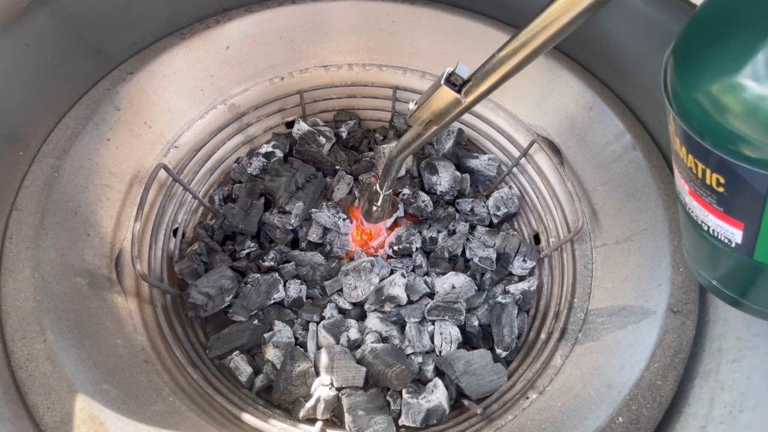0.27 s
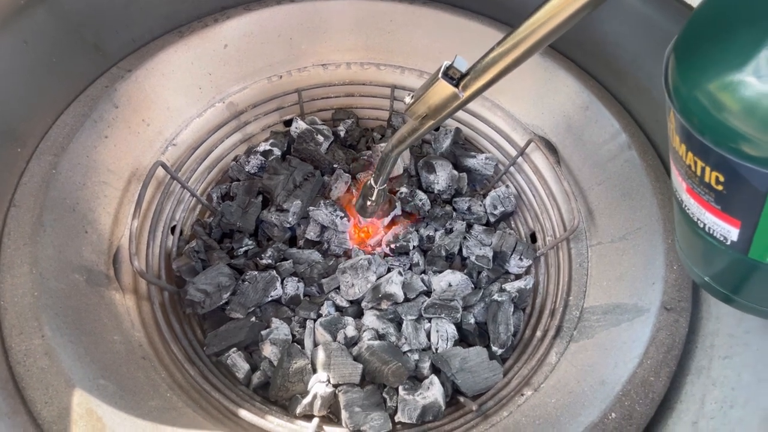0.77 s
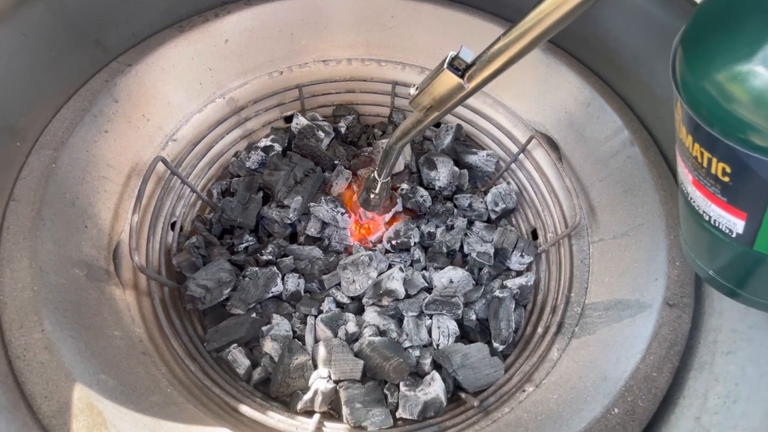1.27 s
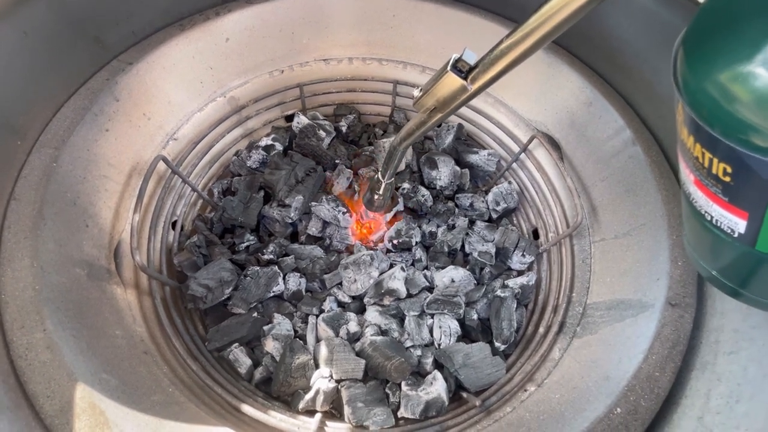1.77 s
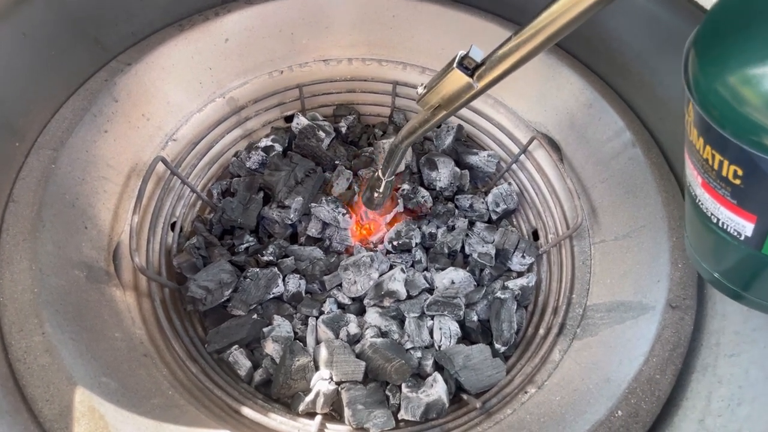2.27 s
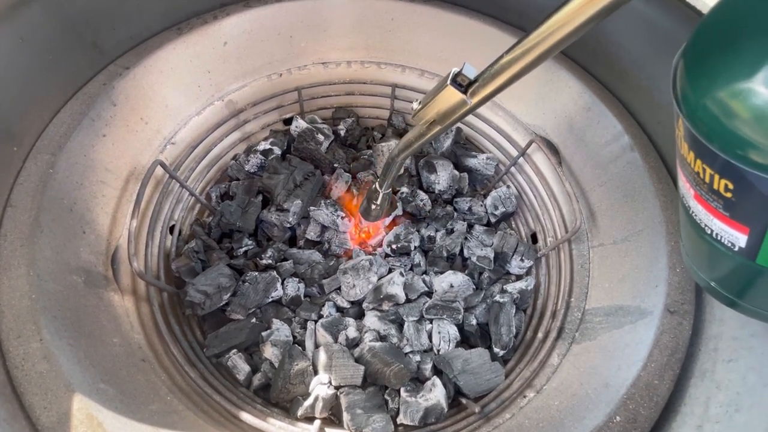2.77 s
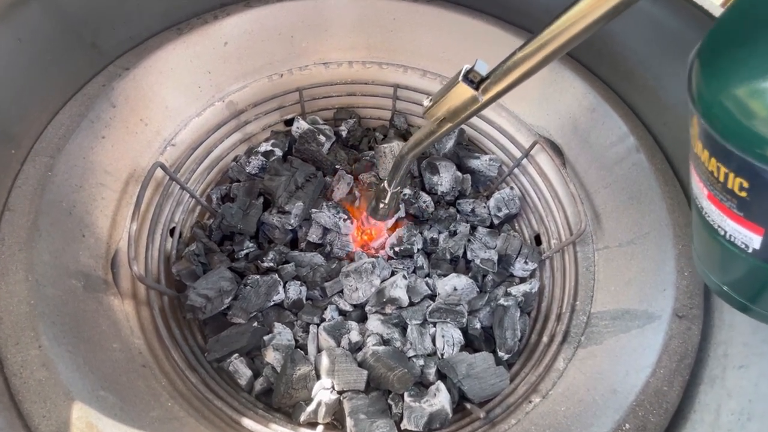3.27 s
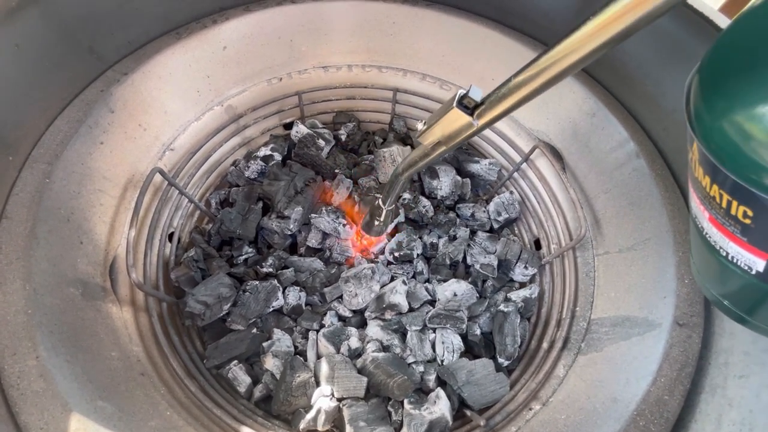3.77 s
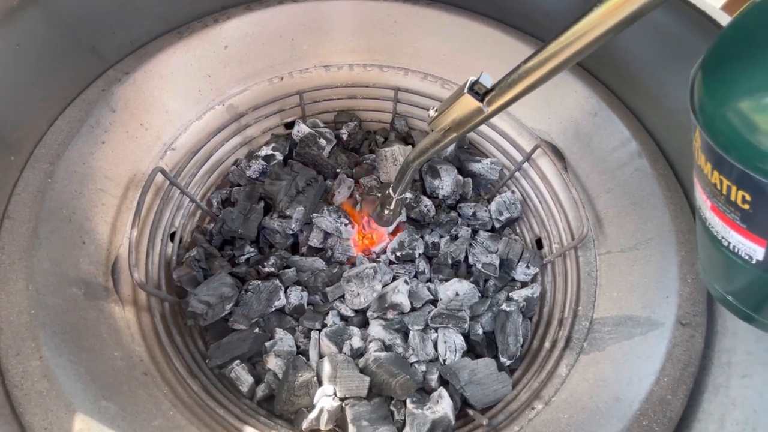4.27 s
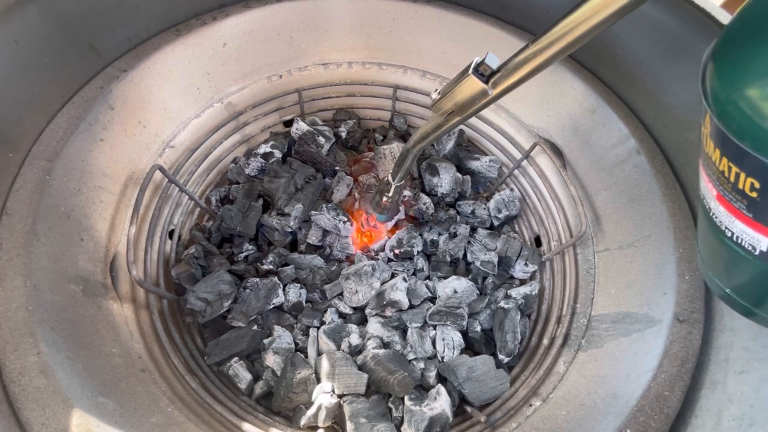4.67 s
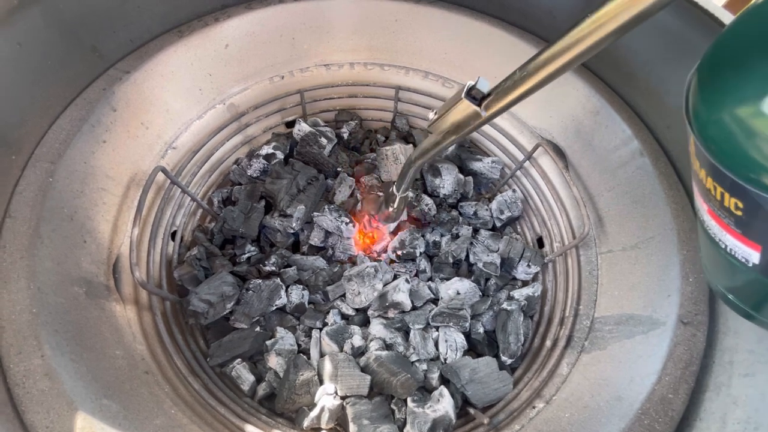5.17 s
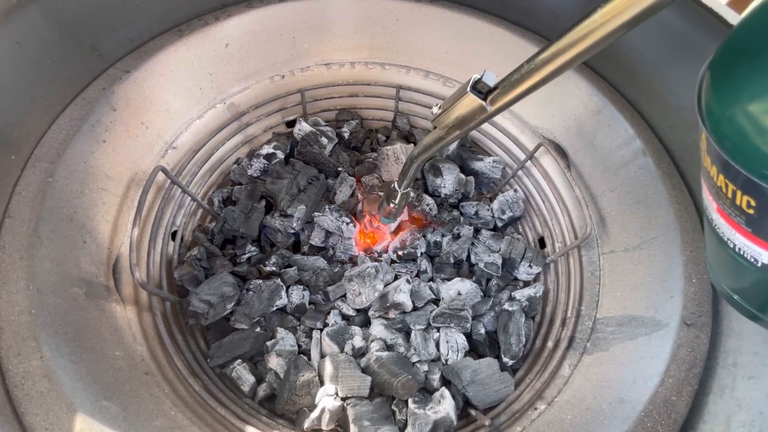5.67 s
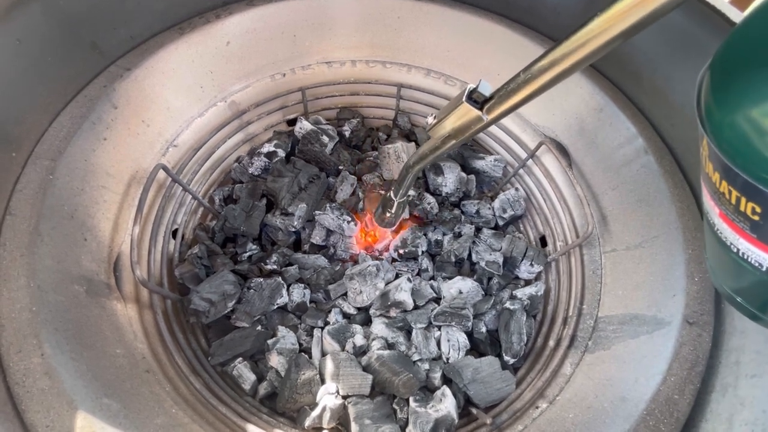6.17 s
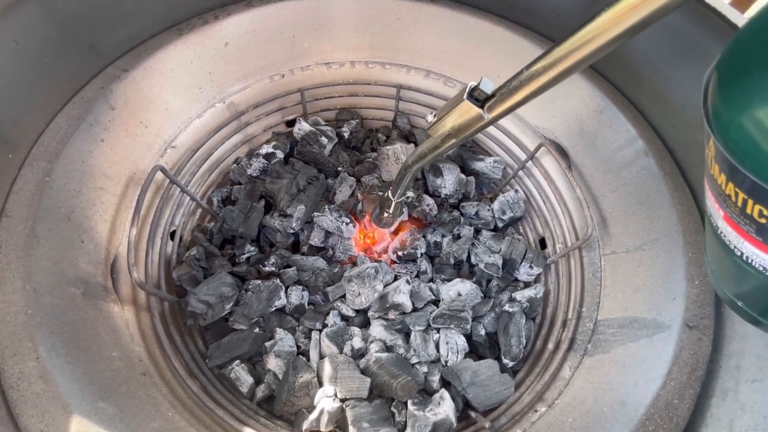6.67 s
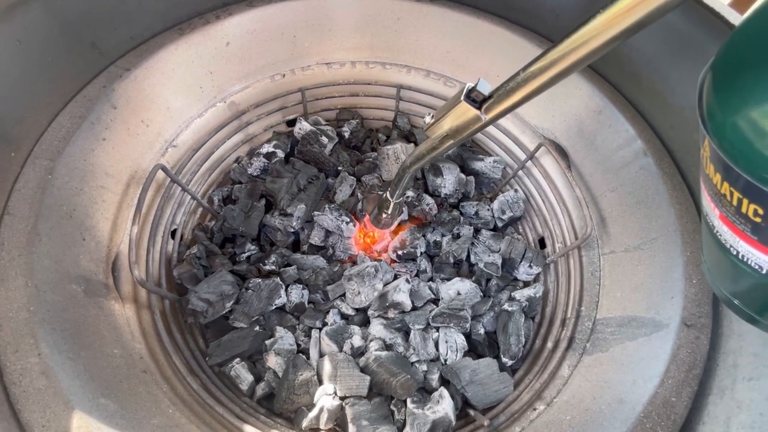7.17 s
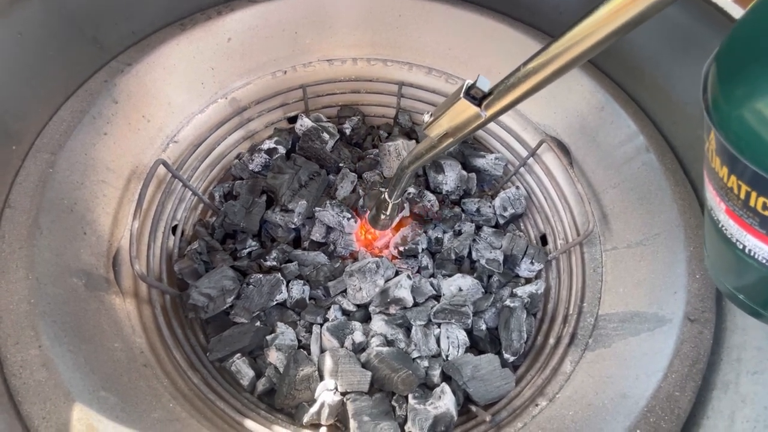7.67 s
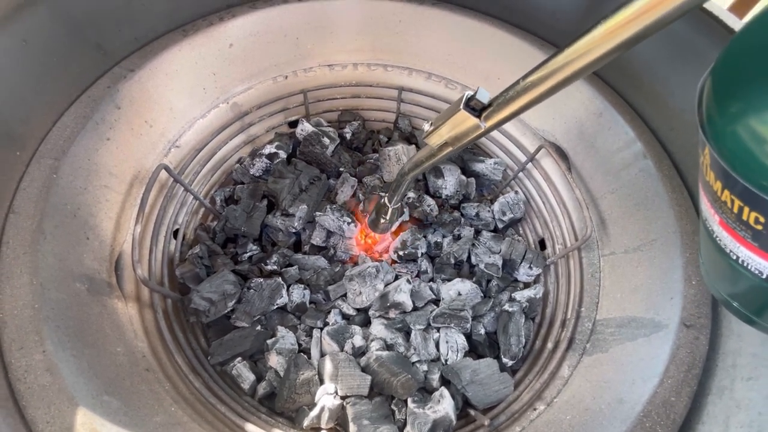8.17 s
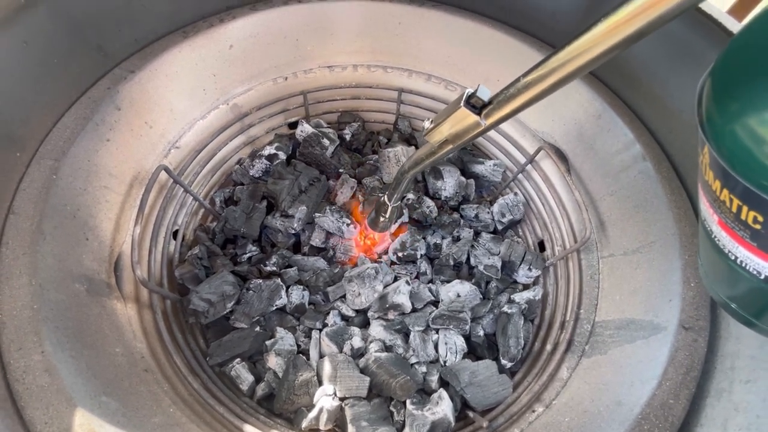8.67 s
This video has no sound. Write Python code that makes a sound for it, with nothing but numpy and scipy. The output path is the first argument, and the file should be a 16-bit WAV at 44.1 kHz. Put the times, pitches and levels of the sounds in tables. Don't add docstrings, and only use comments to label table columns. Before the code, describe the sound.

A gas torch hisses steadily and strongly onto charcoal, with a low fluttering flame roar growing beneath it and outdoor wind buffeting the microphone.

```python
import sys
import numpy as np
from scipy import signal
from scipy.fft import rfft, irfft
from scipy.io import wavfile
from scipy.ndimage import uniform_filter1d

SR = 44100
rng = np.random.default_rng(int(sys.argv[2]) if len(sys.argv) > 2 else 0)


def voltage_ratio(decibels):
    exponent = np.asarray(decibels, float) / 20
    return 10 ** exponent


def waveform_to_disk(signal):
    frames = np.transpose(np.atleast_2d(signal))
    scaled = np.clip(frames, -1, 1) * 32767
    samples = np.round(scaled).astype(np.int16)
    wavfile.write(sys.argv[1], SR, samples)


N = 393813

# (time [s], level [dB])
WIND_SWELL = [(0, -60), (.6, -66), (1.1, -62), (1.42, -47), (1.56, -50), (1.65, -61), (2.05, -62),
              (2.3, -61), (3., -48), (3.6, -42), (4.05, -43), (4.25, -30), (4.6, -30), (5.25, -34.5),
              (5.5, -42), (7.2, -41), (7.7, -40.5), (8.93, -38.5)]
# (time [s], change [dB], length [s])
GUSTS = [(.808, 9, .12), (1.896, 5, .1), (2.165, 23, 0.12), (3.143, 11, 0.083), (3.557, 5, .08),
         (3.8, 5, .12), (3.981, -12, .05), (4.7, -9, 0.087), (4.9, 3, .1), (5.19, 0, .06), (7.144, 3, .08),
         (7.39, -12, .05), (7.45, 5, .1), (7.663, -11, .05), (7.992, 2, 0.083)]
# (frequency [Hz], level [dB])
GUST_COLOUR = [(15, -20), (30, -14), (50, -3), (80, -0.5), (110, 1), (200, -10), (300, -20)]
# (time [s], level [dB], length [s], left minus right [dB])
PUFFS = [(0.162, -40, 0.075, -9), (0.336, -36, 0.11, -12), (0.672, -42, 0.25, -5), (1.196, -39, 0.12, -3),
         (1.447, -34, 0.24, -10), (1.61, -35, .06, -2), (1.748, -50, 0.055, -6), (1.907, -36, 0.28, -3),
         (2.147, -33.5, 0.1, -9), (2.336, -37, 0.11, -5), (3.113, -37, 0.11, -6), (3.882, -34, 0.15, -6),
         (4.52, -37.5, 0.097, -19), (4.95, -39, 0.23, -4), (5.3, -40, 0.14, 0)]
# (frequency [Hz], level [dB])
PUFF_COLOUR = [(60, -36), (110, 4.5), (170, 3.5), (280, -1.5), (450, -6.5), (650, -20), (1000, -45)]
# (time [s], change [dB], length [s])
BASS_DIPS = [
    (.395, -10, .13),
    (.925, -6, 0.094),
    (2.04, -5, 0.14),
    (2.39, -11, 0.057),
]

# (time [s], level [dB])
ROAR_SWELL = [(0, -36.5), (.3, -38.5), (.55, -36), (1., -33.5), (1.3, -26.5), (1.5, -27), (1.58, -34),
              (1.95, -39.5), (2.05, -41), (2.2, -32), (2.42, -35), (2.46, -24.5), (3.6, -25), (5.2, -25.5),
              (5.8, -22), (7.1, -21.5), (7.9, -24.5), (8.93, -23.5)]
# (time [s], change [dB])
FLARES = [(0.066, 12), (.619, 8), (1.327, 1), (1.412, 0), (1.791, 3), (2.135, 13.5), (2.534, 4), (2.70, 4),
          (2.824, -3.5), (2.86, 2), (3.652, -4), (3.801, 9), (4.205, 5.5), (4.689, 7), (4.789, 7),
          (4.939, 3.5), (5.188, -4), (5.565, 3), (5.632, -13), (6.061, 4), (6.14, -9), (6.685, 4),
          (6.755, -15), (6.929, 5.5), (6.975, -11), (7.917, -14), (8.002, 3), (8.436, 8), (8.53, 6.5),
          (8.66, -1)]
# (frequency [Hz], level [dB per Hz])
BOWL_LOW = [(24, -57), (40, -38), (97, -11), (134, -2), (150, 3.5), (170, -2.5), (259, -21), (265, -36),
            (340, -61), (580, -120)]
# (frequency [Hz], level [dB per Hz])
BOWL_HIGH = [(150, 3.5), (260, -14), (289, 4.5), (312, 3.5), (331, 1.5), (366, -8.5), (421, -12.5),
             (480, -75), (620, -75), (1060, -120)]

# (time [s], level [dB])
JET_SWELL = [(0, -33.5), (.4, -33), (1., -32), (1.55, -32.5), (2.4, -31.5), (2.75, -32), (3.3, -31),
             (4.2, -31.5), (4.65, -30), (4.95, -34), (5.3, -30), (5.9, -31.5), (6.25, -33), (6.8, -29.5),
             (7.45, -28.5), (7.95, -30.5), (8.5, -31.5), (8.93, -29.5)]
# (frequency [Hz], half width [Hz], level [dB], left minus right [dB], extra lead
BURNER_MODES = [(498, 96, -68.5, -1, 2), (629, 65, -70, -17, 0.3), (932, 27, -69.0, -11, -0.3),
                (1023, 40, -57.5, -3.1, -0.17), (1256, 87, -68.5, -3.5, 1.06), (1666.6, 45, -57, -3, -0.37),
                (1790, 330, -69, 0.1, -0.96), (2219, 48, -59, -4, -0.5), (2517, 110, -70.5, -3.5, -1),
                (2860, 95, -70.4, 4, -1.22), (3270, 270, -71, -2.5, -0.94), (3410, 54, -70.5, -6, -0.2),
                (3965, 166, -68.5, -3.5, 0.73), (4656, 100, -65, 0, -1.17), (5090, 140, -69.5, 10, -0.9),
              (5212, 66, -60, 4.5, 0.063), (5773, 162, -61, -3.5, 0.39), (6010, 380, -63, -5, -1.4),
              (6324, 161, -59, -1.5, 0.88), (6820, 110, -63, -1.8, -0.55), (7560, 150, -72, 4, 0.033),
                (8120, 256, -71.7, 3.4, 0.1), (9080, 479, -81.1, 2.8, -1.6),
                 (9770, 390, -76.8, -5.0, 1.0), (10250, 171, -71.7, -5.1, 0.3),
                 (10740, 119, -71.2, -1.4, 0.0), (11320, 184, -68.8, -0.2, -0.1),
                 (11780, 143, -76.8, -0.7, -0.1), (12760, 542, -83.7, -0.9, -2.0),
                 (15420, 252, -79.9, -0.0, -1.5)]
# (frequency [Hz], level [dB], left minus right [dB], left-right likeness [0-1])
SCATTER = [(414, -76, -3.5, 0.52), (790, -73.5, -4.5, 0.22), (1440, -80.5, -2, .05), (1970, -75.5, 4, 0.3),
           (2690, -72.5, -4.5, 0.58), (3250, -74.5, -2, 0.95), (3600, -76.5, 4, 0.23),
           (4120, -76.5, 1, 0.91), (4850, -75.5, 0, .1), (5700, -70, -4.5, 0.056), (7200, -77, 6, .05),
           (8500, -75, 1.5, 0.63), (11000, -84.5, -2, 0.83), (13750, -82, 0, 0.37), (13950, -85, 0, .99),
           (15100, -79.5, 0, 1), (15250, -78, 2, 0.68)]
# (frequency [Hz], phase [rad])
PORT_LEAD = [(400, .5), (1500, 4.), (3200, 9.3), (3550, 9.6), (3900, 11.7), (4150, 12.5), (4400, 14.3),
             (5300, 18.6), (5900, 16.6), (6950, 22.1), (7600, 20.5), (8700, 22.6), (9400, 27.8),
             (10500, 25.3), (12300, 25.1), (13900, 22.)]
# (time [s], change [dB], length [s])
TURNS = [
    (3.5, 2, 0.58),
    (4.4, 1.5, .9),
    (5.7, -1, 0.79),
    (7.3, -1.5, 0.96),
]
# (time [s], change [dB], length [s])
CANCELS = [
    (.28, -4, .35),
    (1.5, -4, 0.58),
    (2.85, -4, .7),
    (4.2, -4, .5),
    (7.4, -4.5, 0.98),
    (8.3, -3, .5),
]

FRAME, HOP = 2048, 512


def evened(x):
    return x / np.sqrt(np.mean(x ** 2) + 1e-20)


def read(points, hz):
    f, *columns = np.transpose(points)
    return [np.interp(np.log(hz + 1), np.log(f + 1), c) for c in columns]


def follow(rows, t):
    s, *columns = np.transpose(rows)
    return [np.interp(t, s, c) for c in columns]


def bumps(rows, s):
    coarse = np.arange(0, N / SR + 1, 1 / 500)
    total_db = sum(db * np.exp(-(2 * (coarse - at) / length) ** 2) for at, db, length in rows)
    return np.interp(s, coarse, total_db)


def wander(t, slow_hz, fast_hz):
    rates = np.geomspace(slow_hz, fast_hz, num=24)
    return evened(sum(np.sin(2 * np.pi * (f * t + rng.random())) / np.sqrt(f) for f in rates))


def band(x, low_hz, high_hz):
    return signal.sosfiltfilt(signal.butter(4, [low_hz, high_hz], "bandpass", fs=SR, output="sos"), x)


def coloured(points, same, lead=0., balance_db=0.):
    hz, same = np.fft.rfftfreq(N, 1 / SR), np.clip(same, 0, 1)
    left, other = rfft(rng.standard_normal((2, N)))
    right = (same * left + np.sqrt(1 - same ** 2) * other) * np.exp(1j * lead)
    pair = np.array([left * voltage_ratio(balance_db / 2), right / voltage_ratio(balance_db / 2)])
    inside = (hz > points[0][0]) & (hz < points[-1][0])
    return evened(irfft(pair * voltage_ratio(read(points, hz)[0]) * inside, N))


def port_pair(shape, same, lead):
    a, b, c, d = np.moveaxis(rng.standard_normal(shape + (4,)), -1, 0)
    same, left = np.clip(same, 0, 1), a + 1j * b
    right = (same * left + np.sqrt(1 - same ** 2) * (c + 1j * d)) * np.exp(1j * lead)
    return np.array([left, right])


def puffs(s, lumps):
    sides = np.array([[.5], [-.5]])
    strength = sum(voltage_ratio(db + pan_db * sides) * np.exp(-(2 * (s - at) / length) ** 2)
                   for at, db, length, pan_db in PUFFS)
    strength = strength * voltage_ratio(bumps(BASS_DIPS, s))
    return band(strength * evened(lumps * coloured(PUFF_COLOUR, 0.035)), 90, 900)


def wind():
    s, sides = np.arange(N) / SR, np.array([[.5], [-.5]])
    throb_db = follow(WIND_SWELL, s)[0] + bumps(GUSTS, s) + 1.8 * bumps(BASS_DIPS, s)
    deep_rise_db = -11 / (1 + np.exp((s - 4.1) / .2))
    deep_db = -11.5 + 0.4 * (throb_db + 37) + deep_rise_db
    lumps = voltage_ratio(0.54 * np.array([wander(s[::64], 2, 25).repeat(64)[:N] for port in "LR"]))
    gusty = np.clip((uniform_filter1d(throb_db + deep_db, size=8000) + 51.5) / 14, .04, 1)
    alike = np.sqrt(1 - gusty) * coloured(GUST_COLOUR, 0.96)
    apart = np.sqrt(gusty) * coloured(GUST_COLOUR, .03, balance_db=-8.0)
    throb = voltage_ratio(throb_db + 1.6) * evened(lumps * band(alike + apart, 58.6, 107))
    deep_noise = evened(lumps * band(coloured(GUST_COLOUR, .1), 20, 58))
    deep = voltage_ratio(throb_db + deep_db + 2.0 - 5.3 * sides) * deep_noise
    return band(throb, 54, 130) + band(deep, 22, 70) + puffs(s, lumps)


def flame():
    s = np.arange(N) / SR
    burn_db, dip_db = follow(ROAR_SWELL, s)[0], bumps(BASS_DIPS, s)
    flare_length_s = 0.038
    flare_db = bumps([(at, db, flare_length_s) for at, db in FLARES], s)
    upper_db = -35 + 0.46 * (burn_db - burn_db.max()) + 0.067 * flare_db + 0.5 * dip_db
    low = coloured(BOWL_LOW, 0.97, lead=0.16, balance_db=1.8)
    high = coloured(BOWL_HIGH, .985, lead=.25, balance_db=-3.)
    boom_power = signal.fftconvolve(low ** 2, np.hanning(2600)[None] / 1300, "same")
    low /= np.abs(boom_power + 0.1) ** 0.2
    roar = voltage_ratio(burn_db + flare_db + dip_db) * evened(low) + voltage_ratio(upper_db) * high
    return band(roar, 96.0, 690)


def burner_modes(t, hz):
    shape, sides = (len(t), len(hz)), np.array([.5, -.5])[:, None, None]
    scatter_db, scatter_pan_db, same = read(SCATTER, hz)
    power = voltage_ratio(2 * (scatter_db + scatter_pan_db * sides)) * np.ones(shape)
    shared = same * voltage_ratio(2 * scatter_db) * np.ones(shape, complex)
    warming_per_s = .0012
    for mode_hz, width, db, pan_db, turn in BURNER_MODES:
        centre = mode_hz * (1 + warming_per_s * (t - t.mean()) + 0.0025 * wander(t, 0.21, 2.6))
        unsteady_db = 0.48 + 0.93 * (4000 < mode_hz < 7500)
        mode_db = db + unsteady_db * wander(t, 0.2024, 6)
        peak = voltage_ratio(2 * mode_db) / (1 + ((hz - centre) / width) ** 2) ** 2
        power += peak * voltage_ratio(2 * pan_db * sides)
        shared += 1.01 * peak * np.exp(1j * turn)
    likeness = shared / np.sqrt(power[0] * power[1])
    lead = np.angle(likeness) + np.interp(hz, *np.transpose(PORT_LEAD))
    return np.sqrt(power) * port_pair(shape, abs(likeness), lead)


def bowl_echoes(z, t, hz):
    wall_path_s = .0031 + .00006 * wander(t, 0.25, 7)
    wall = 0.75 * np.clip(hz / 5900, 0, 1) ** 7 / (1 + (hz / 8500) ** 6)
    z = z * (1 + wall * np.exp(-2j * np.pi * hz * wall_path_s)) / np.sqrt(1 + wall ** 2)
    rim_path_s = .0085 + .00004 * wander(t, .3, 4)
    rim = 0.28 * np.clip(hz / 2500, 0, 1)
    return z * (1 + rim * np.exp(-2j * np.pi * hz * rim_path_s))


def jet_swells(t, hz):
    patches = rng.standard_normal((len(t), len(hz)))
    patches = evened(uniform_filter1d(uniform_filter1d(patches, size=8, axis=0), size=10, axis=1))
    swell_db = follow(JET_SWELL, t)[0] - np.mean(JET_SWELL, axis=0)[1]
    low_db = (0.034 - 1) * swell_db - 0.06 * t + bumps(TURNS, t)
    top_db = (-0.33 - 1) * swell_db - 0.14 * t
    top_db = top_db - top_db.mean() + 0.82 * wander(t, 1.7, 25)
    low = 1 / (1 + (hz / 3300) ** 6)
    top = 1 - 1 / (1 + (hz / 7800) ** 8)
    cancel_db = bumps(CANCELS, t) * np.exp(-((hz - 3270) / 210) ** 2)
    return voltage_ratio(1.08 * patches + low * (low_db - low_db.mean()) + top * top_db + cancel_db)


def jet():
    t = (np.arange(N // HOP + 5) * HOP / SR)[:, None]
    hz = np.fft.rfftfreq(FRAME, 1 / SR)
    z = bowl_echoes(burner_modes(t, hz), t, hz) * jet_swells(t, hz)
    x = signal.istft(np.swapaxes(z, 1, 2), nperseg=FRAME, noverlap=FRAME - HOP)[1][:, :N]
    level_db = follow(JET_SWELL, np.arange(N) / SR)[0] + 5.5
    return voltage_ratio(level_db) * evened(band(x, 240, 17500))


def scene():
    return wind() + flame() + jet()


def roll_off(x):
    return signal.sosfilt(signal.butter(12, 15870, fs=SR, output="sos"), x)


def record(dry):
    lowpass = signal.firwin(801, 15770, window=("kaiser", 9), fs=SR)
    limited = signal.oaconvolve(dry, lowpass[None], "same")
    return roll_off(limited)


dry = scene()
out = record(dry)
waveform_to_disk(out)
```